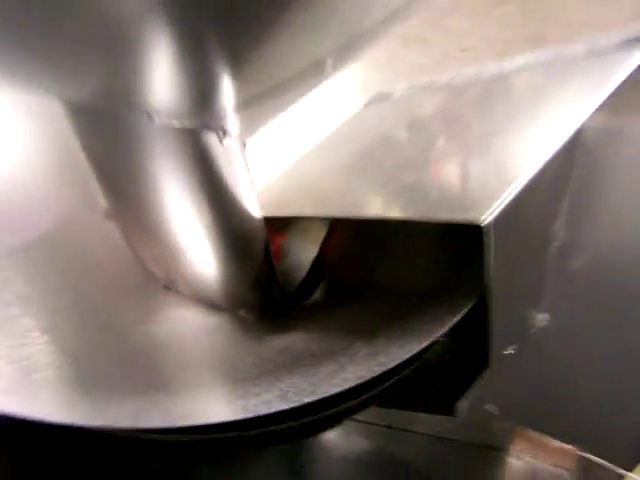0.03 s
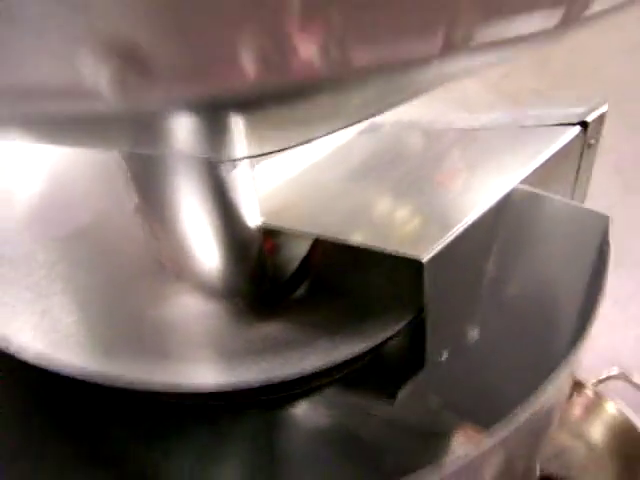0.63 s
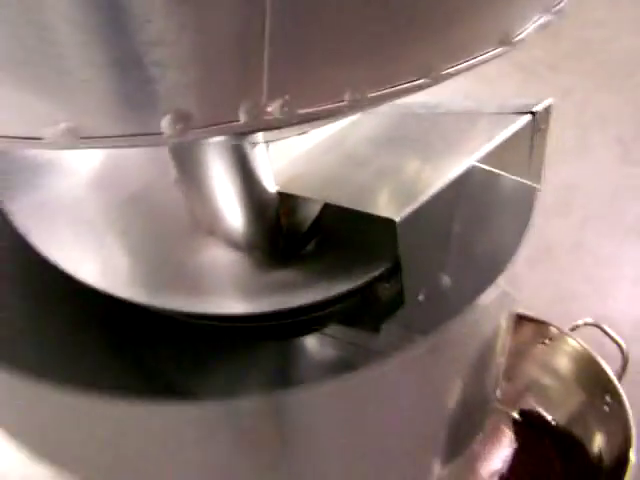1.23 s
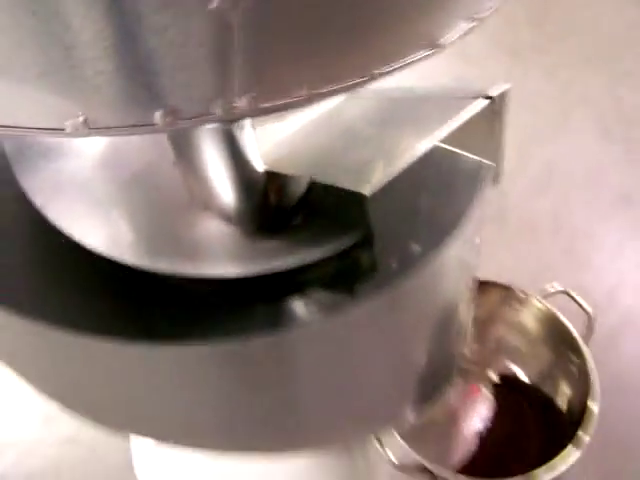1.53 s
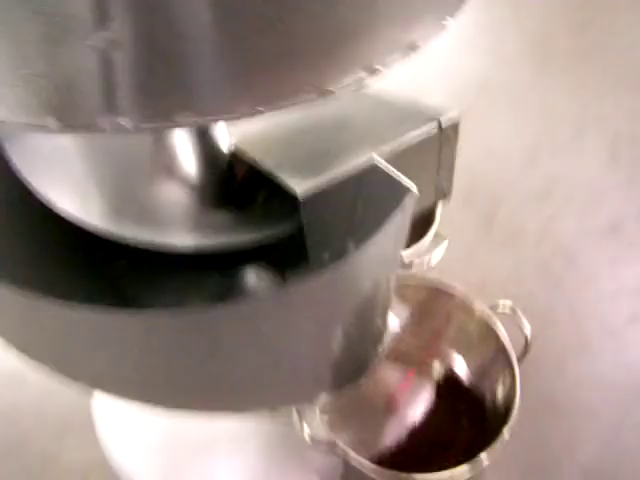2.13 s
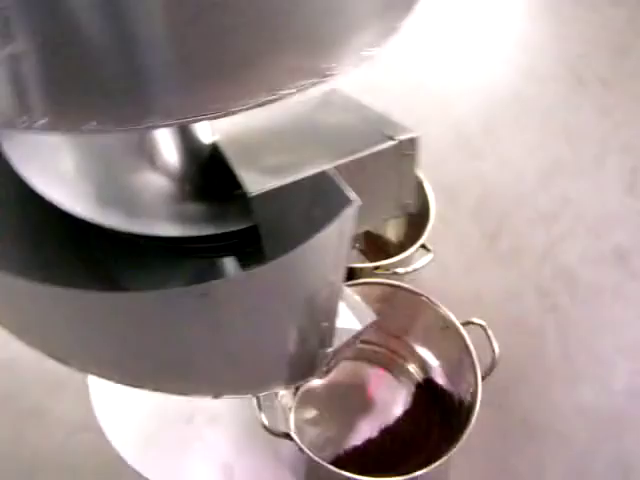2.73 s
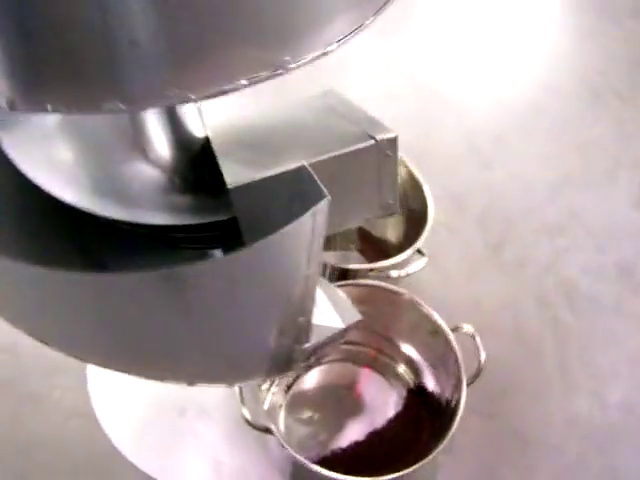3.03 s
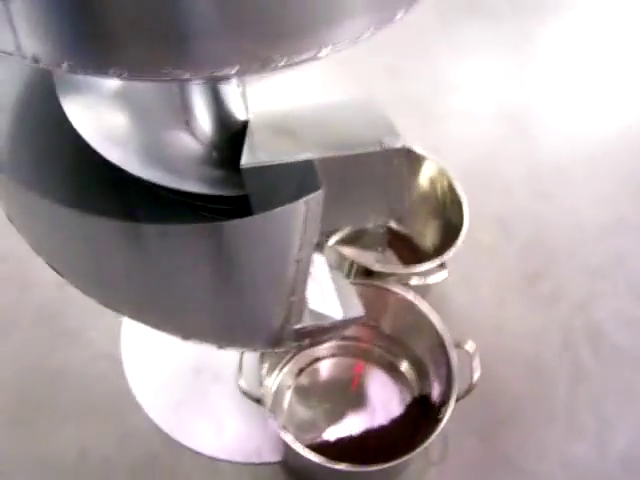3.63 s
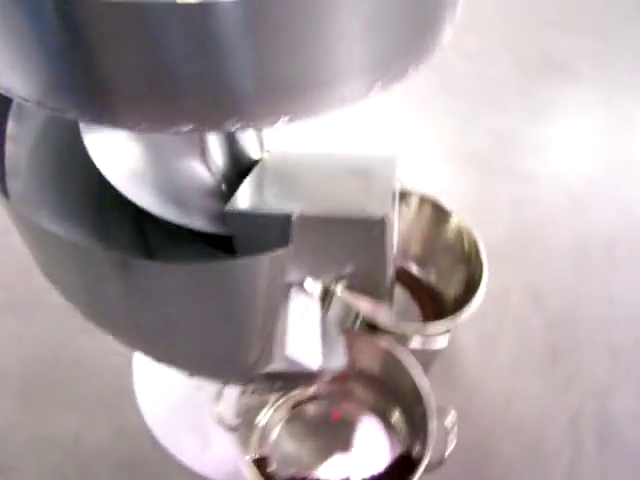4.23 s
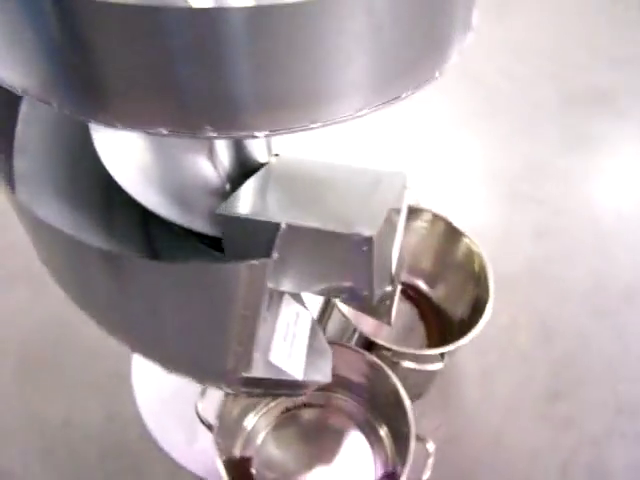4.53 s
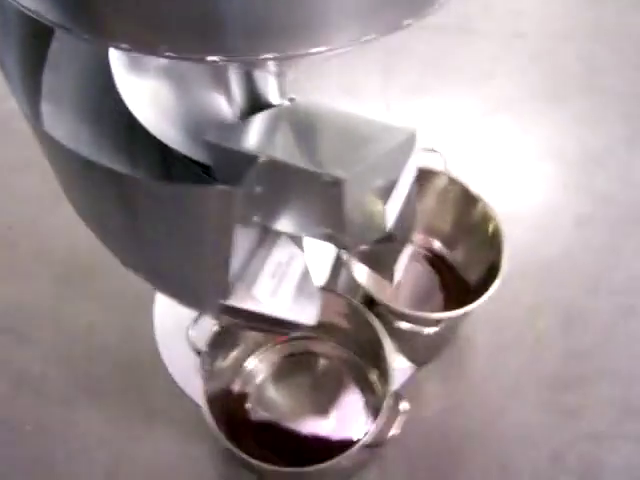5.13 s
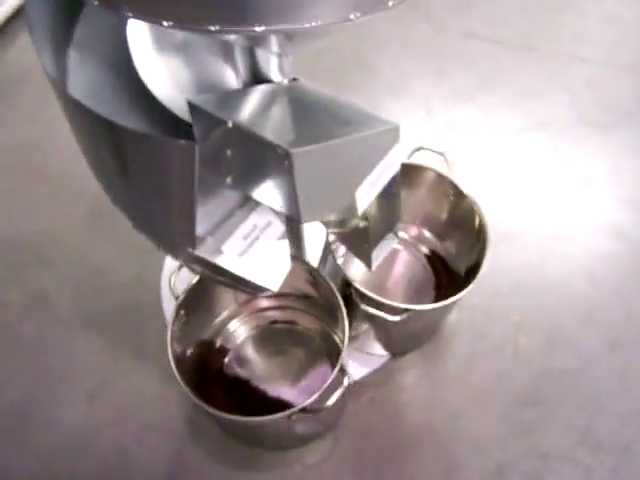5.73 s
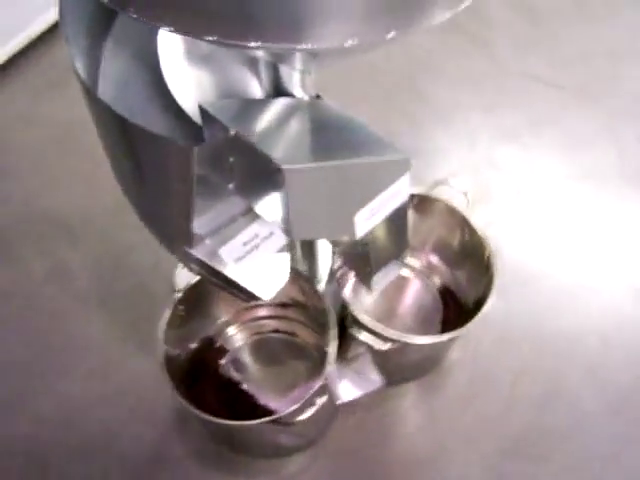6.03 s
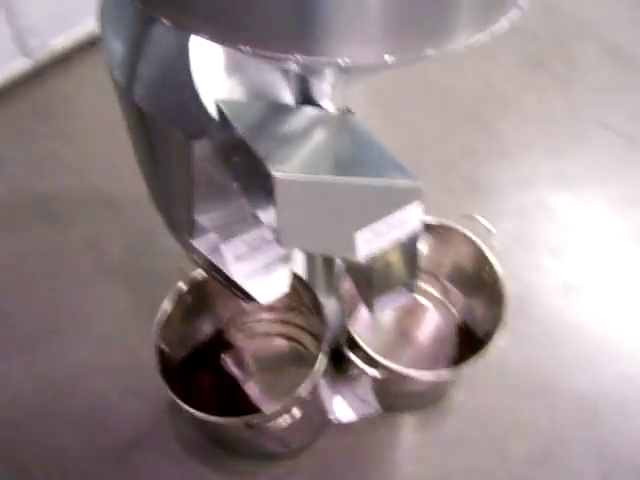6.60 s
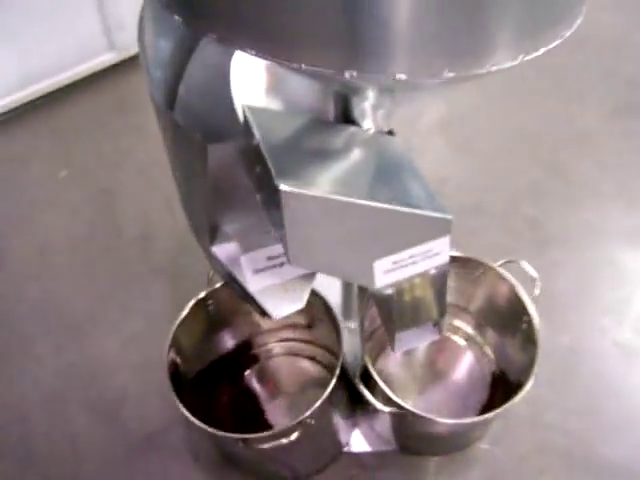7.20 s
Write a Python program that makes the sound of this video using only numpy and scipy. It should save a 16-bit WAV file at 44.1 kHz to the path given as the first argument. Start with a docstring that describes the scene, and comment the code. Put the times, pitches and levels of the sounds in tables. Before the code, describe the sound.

A bright, even hiss of tiny grains rolling and ticking on steel, with faint metallic ringing and a workshop hum underneath.

```python
"""From the start, small seeds stream down a steel spiral separator and drop from its chutes into two
pots: thousands of tiny impacts a second merge into a hiss, with nearer ticks on top, while the workshop
rumbles and hums underneath. As the microphone backs away from the top chute, ringing bands of the hiss
swell and fade in turn, rising in pitch. Around 3.3 s it passes over the pots and the steel rings a
little louder. The stream runs on evenly, and a soft hollow knock comes just before the end."""
import sys
import numpy as np
from scipy import signal
from scipy.fft import rfft, irfft, next_fast_len
from scipy.io import wavfile
from scipy.ndimage import map_coordinates

SR = 44100
rng = np.random.default_rng(int(sys.argv[2]) if len(sys.argv) > 2 else 0)


def wav_record(signal):
    """Record a signal, one row per channel, as 16-bit PCM in the file named by sys.argv[1]."""
    frames = np.transpose(np.atleast_2d(signal))
    bounded = np.clip(frames, -1, 1)
    # unit amplitude maps onto the largest positive 16-bit level
    quanta = np.round(bounded * 32767).astype(np.int16)
    wavfile.write(sys.argv[1], SR, quanta)


N = 320166
TIME = np.arange(N) / SR


def amp(db):
    """Turn decibels into a gain to multiply by."""
    return 10 ** (np.asarray(db) / 20)


def unit(x):
    """Scale x to an average (rms) level of 1."""
    return x / np.sqrt(np.mean(x ** 2) + 1e-20)


def wobble(rate):
    """A smooth random curve that heads for a new value rate times a second."""
    knots = rng.standard_normal(int(N * rate / SR) + 4)
    grid = np.linspace(0, TIME[-1], 4000)
    return np.interp(TIME, grid, map_coordinates(knots, [grid * rate]))


def passing(at_s, half_s):
    """How near (0 to 1) the microphone is to a spot that it passes at time at_s."""
    return np.exp(-.5 * ((TIME - at_s) / half_s) ** 2)


def filtered(x, response):
    """Multiply each frequency in x by the gain that response gives for it."""
    size = next_fast_len(N + SR // 2)
    return irfft(rfft(x, size) * response(np.fft.rfftfreq(size, 1 / SR)), size)[:N]


def coloured(x, spectrum):
    """Give x the tone colour drawn by (Hz, dB) points, at level 1."""
    size = 2 ** 14
    hz, db = np.transpose(spectrum)
    curve_db = np.interp(np.log(np.fft.rfftfreq(size, 1 / SR) + 1), np.log(hz + 1), db)
    # fold the filter so that it rings only after each impact, never before
    cepstrum = irfft(np.log(amp(curve_db)))
    cepstrum[1:size // 2] *= 2
    cepstrum[size // 2 + 1:] = 0
    impulse_response = irfft(np.exp(rfft(cepstrum)))
    return unit(signal.fftconvolve(x, impulse_response)[:N])


def resonant(x, hz, width_hz):
    """Make x ring in one narrow band around hz, at level 1."""
    return unit(filtered(x, lambda f: (2j * f * width_hz / (hz * hz - f * f + 2j * f * width_hz)) ** 2))


def impacts(rate, spread_db):
    """Random clicks, rate a second, their sizes scattered over spread_db."""
    count = rng.poisson(np.broadcast_to(rate / SR, N))
    return np.sqrt(count) * rng.choice([-1, 1], N) * amp(-spread_db * rng.random(N))


def hall(x, wet_db, fade_s):
    """Add the hall's echo: impacts land in ever new places, so it is noise that follows their energy."""
    keep = np.exp(-np.log(1e6) / (fade_s * SR))  # dies by 60 dB in fade_s
    energy = signal.lfilter([1 - keep], [1, -keep], unit(x) ** 2, zi=[keep])[0]
    return unit(x) + amp(wet_db) * np.sqrt(energy) * rng.standard_normal(N)


def workshop():
    """The room rumbles and distant machines hum unsteadily."""
    # Tone colour of the room. Each row: frequency in Hz, relative level in dB.
    rumble_colour = [(10, -11), (25, -4), (60, 4.5), (75, -2.5), (120, 0), (145, -1), (215, -1.4),
                     (300, -5), (450, -11), (800, -12), (2000, -36.5)]
    # Machine tones. Each row: pitch in Hz, base level in dB.
    machine_tones = [(95, -58), (188.4, -54.5), (212, -57), (360, -62), (379, -63)]
    rumble = coloured(rng.standard_normal(N), rumble_colour)
    rumble_db = -45 + 0.4 * TIME  # grows as the microphone moves into the open
    hum = 0
    for hz, db in machine_tones:
        peak = np.sqrt(2) * amp(db + 2.6 * wobble(6))
        hum += peak * np.sin(2 * np.pi * hz * TIME + 1.27 * wobble(14))
    # the hum forms standing waves, and the microphone crosses their loud spots
    loud_at_s, loud_every_s = 2.8, 3.6
    hum_db = -0.1 + 2 * np.cos(2 * np.pi * (TIME - loud_at_s) / loud_every_s)
    return amp(rumble_db) * rumble + amp(hum_db) * hum


def knock():
    """A short, soft push dies away in one hollow resonance."""
    # Each row: start in seconds, pitch in Hz, band width in Hz, level in dB, seconds to fade by 60 dB.
    knocks = [(7.233, 1140, 250, -20.5, 0.036)]
    out = np.zeros(N)
    for start_s, hz, width_hz, db, fade_s in knocks:
        age = np.maximum(TIME - start_s, 0)
        rise = 1 - np.exp(-age / 0.0016)
        fall = np.exp(-np.log(1000) * age / fade_s)
        out += amp(db) * rise * fall * resonant(rng.standard_normal(N), hz, width_hz)
    return out


def ringing():
    """Seeds ring the steel, and bands of the hiss swell and fade in turn as the microphone moves."""
    # Faint notes of the sheet steel. Each row: pitch in Hz, band width in Hz, base level in dB.
    steel_notes = [(723, 40, -59), (908, 41, -55.5), (1050, 46, -52), (1142, 35, -53.5), (1332, 57, -48.5),
                   (1805, 80, -46.5)]
    # Ringing bands of the hiss; the three loudest rise in pitch one after another. Each row: loudest
    # moment in seconds, half duration in seconds, pitch in Hz, band width in Hz, highest level in dB.
    hiss_bands = [(.15, 0.19, 1050, 190, -43), (.45, .55, 88, 40, -48), (.5, 0.49, 910, 50, -50),
                  (0.453, 0.13, 2400, 230, -29), (0.748, .17, 3020, 398, -32.5),
                  (1.3, 0.7, 3420, 400, -30.5), (6.9, 0.19, 1090, 216, -47)]
    patter, noise = impacts(rate=8000, spread_db=8.5), rng.standard_normal(N)
    ring = sum(amp(db) * resonant(patter, hz, width_hz) for hz, width_hz, db in steel_notes)
    bands = sum(amp(db) * passing(at_s, half_s) * resonant(noise, hz, width_hz)
                for at_s, half_s, hz, width_hz, db in hiss_bands)
    over_pots_db = 2 * passing(at_s=3.3, half_s=1.4)
    return amp(over_pots_db) * ring + bands


def wall_echo(x):
    """A steel wall's echo tints x; its delay shrinks as the microphone backs away, so the colour rises."""
    near_ms, far_ms, retreat_s = 0.45, 0.2, 1.28
    delay_ms = far_ms + (near_ms - far_ms) * np.exp(-TIME / retreat_s)
    echo = map_coordinates(x, [(TIME - delay_ms / 1000) * SR])
    return x + .075 * passing(at_s=1.2, half_s=0.72) * echo


def seeds():
    """A mass of rolling seeds hisses, while fewer bounce hard on the chutes and pots and tick."""
    # Tone colour of seeds rolling on steel. Each row: frequency in Hz, relative level in dB.
    rolling_colour = [(250, -32), (500, -22), (680, -18.5), (830, -22.5), (960, -17.5), (1400, -12.5),
                      (2000, -8), (2500, -2), (3200, 0.8), (5300, 1.28), (6600, -0.5), (7200, -5.5),
                      (7900, -15.5), (10000, -42)]
    # Tone colour of one hard, close hit. Each row: frequency in Hz, relative level in dB.
    tick_colour = [(500, -29.5), (2000, -6), (3200, 0), (5000, 6), (6800, 3), (8000, -1), (8900, -3.5),
                   (9500, -10.5), (10100, -35)]
    soft_hits = impacts(rate=24000, spread_db=9.5)
    rolling = coloured(hall(soft_hits, wet_db=-2, fade_s=.6), rolling_colour)
    clumps = amp(2.2 * wobble(30) + 1.2 * wobble(9))  # bouncing seeds arrive in small groups
    hard_hits = impacts(rate=800 * clumps, spread_db=10)
    bouncing = coloured(hall(hard_hits, wet_db=1, fade_s=0.96), tick_colour)
    # the hopper feeds evenly, but the stream thickens and thins a little on its way down
    flow_db = -18.5 + 0.39 * wobble(21.94) + .18 * wobble(60)
    return amp(flow_db) * (amp(0.22) * rolling + amp(-10) * bouncing)


def scene():
    """The separator and the workshop, heard at one microphone."""
    return (wall_echo(seeds()) + ringing() + knock() + workshop())[None]


def record(dry):
    """Cut away the highest treble."""
    top_hz = 10150
    return np.array([filtered(x, lambda hz: hz < top_hz) for x in dry])


dry = scene()
out = record(dry)
wav_record(out)
```